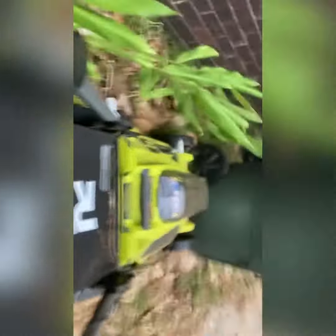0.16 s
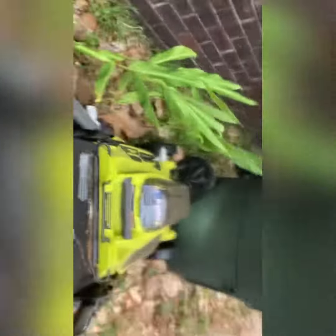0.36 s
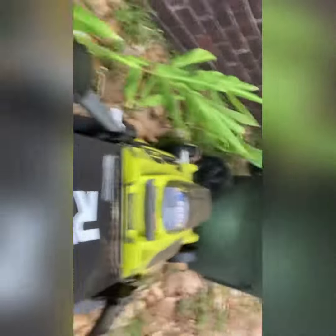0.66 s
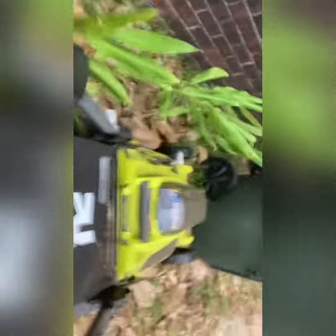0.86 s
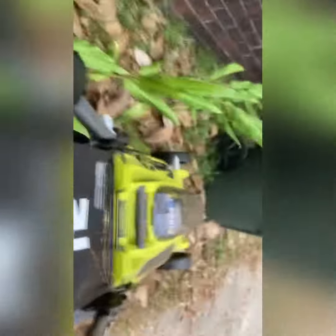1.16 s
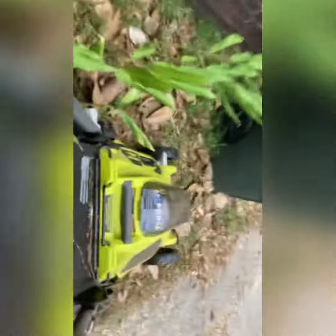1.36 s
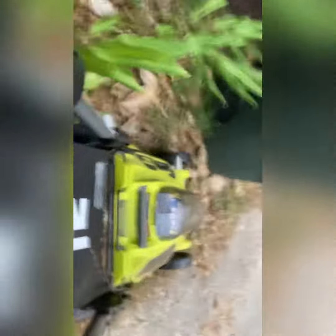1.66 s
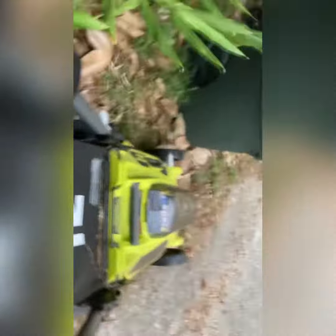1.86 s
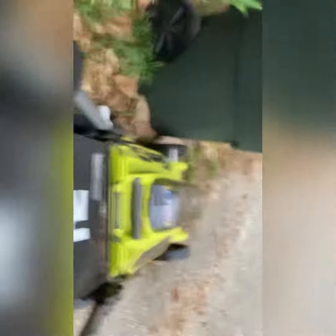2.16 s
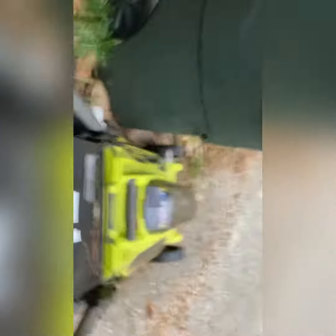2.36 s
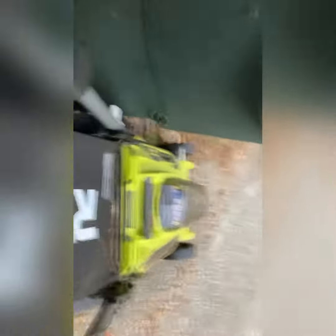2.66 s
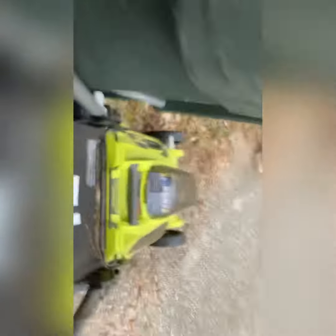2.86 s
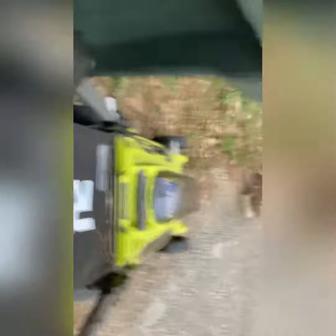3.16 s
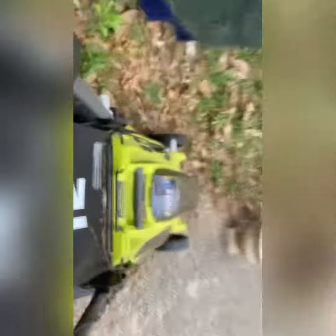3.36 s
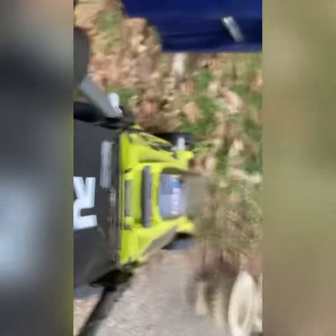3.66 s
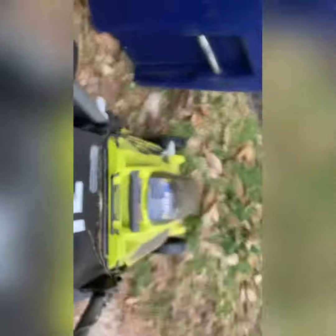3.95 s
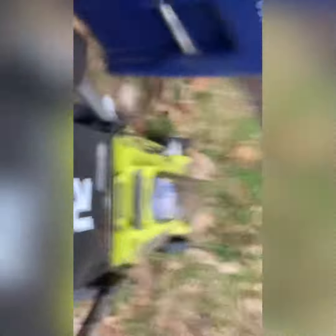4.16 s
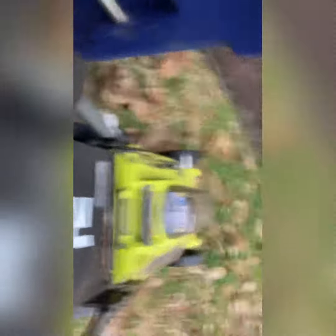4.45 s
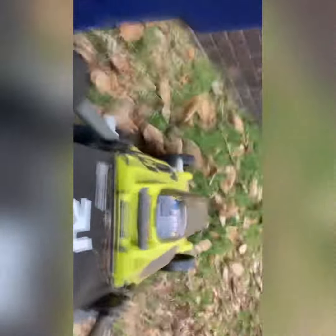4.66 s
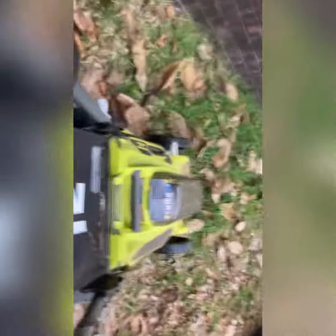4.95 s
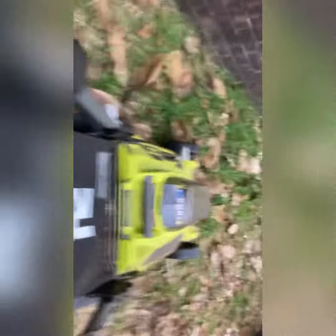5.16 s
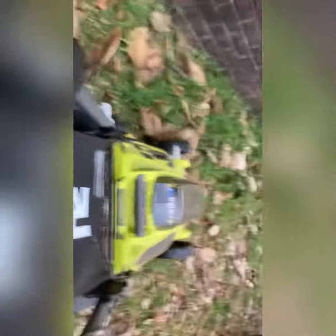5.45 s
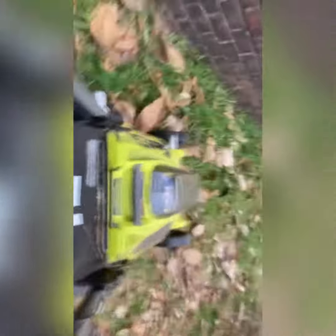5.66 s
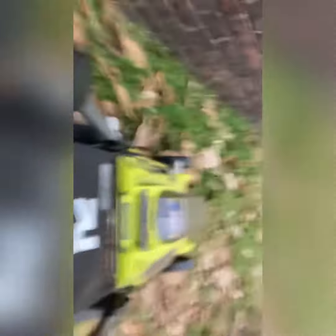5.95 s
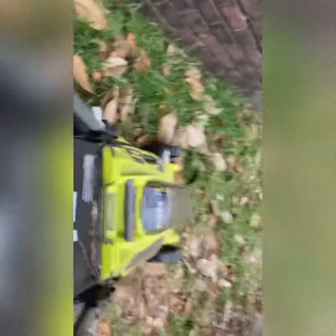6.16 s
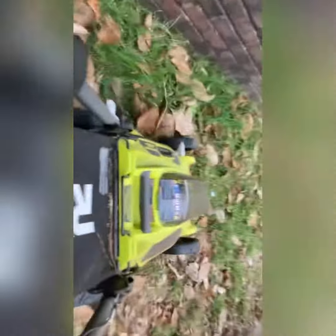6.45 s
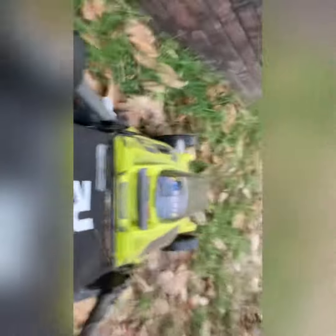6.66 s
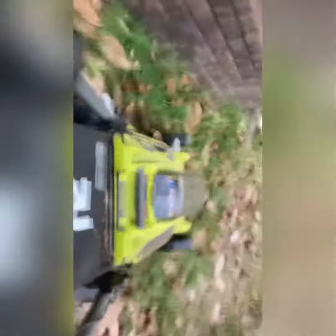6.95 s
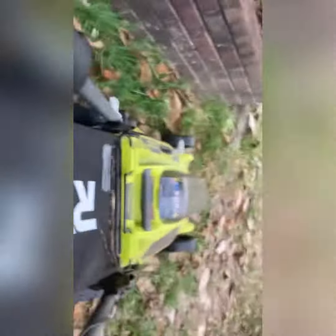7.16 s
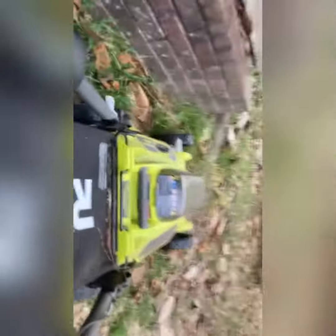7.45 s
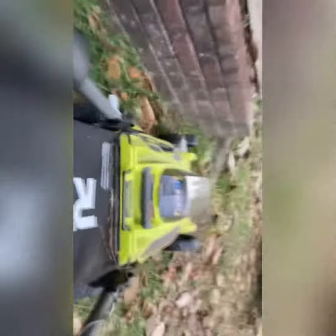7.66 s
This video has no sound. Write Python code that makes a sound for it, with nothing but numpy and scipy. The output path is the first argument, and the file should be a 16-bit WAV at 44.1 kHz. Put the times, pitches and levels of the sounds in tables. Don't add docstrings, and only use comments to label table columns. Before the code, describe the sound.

Close, steady mower whir with rushing air, blade hum dipping under load, crunchy leaf shredding and occasional dull clumps knocking the plastic shell.

```python
import sys
import numpy as np
from scipy import signal
from scipy.fft import rfft, irfft, next_fast_len
from scipy.io import wavfile
from scipy.ndimage import uniform_filter1d, map_coordinates

SR = 44100
rng = np.random.default_rng(int(sys.argv[2]) if len(sys.argv) > 2 else 0)


def gain_from_decibels(decibels):
    exponent = np.asarray(decibels, float) / 20
    return 10 ** exponent


def wrap_up_sound(samples):
    columns = np.atleast_2d(samples).T
    tamed = np.clip(columns, -1, 1)
    steps = np.round(tamed * 32767).astype(np.int16)
    wavfile.write(sys.argv[1], SR, steps)


N = 343980

# time in seconds, pass rate in Hz, hum level in dB.
BLADE = [(0, 132.7, -23.5), (.54, 133.2, -25.5), (.91, 135, -26), (1.15, 127.3, -32.5), (1.5, 113, -30),
         (1.95, 116.9, -35), (2.5, 134.6, -25), (2.65, 136.8, -31), (3.24, 114, -32), (3.45, 118, -33),
         (3.76, 119, -39), (4.08, 120.4, -23.5), (4.6, 121.3, -38.5), (5.24, 132.6, -28.5),
         (5.5, 133.2, -26), (6.1, 122.7, -25), (6.45, 129.4, -25), (7.8, 136.1, -30.5)]
# multiple of the pass rate, level in dB
FURTHER_TONES = [(6, -10), (7, -12), (8, -11), (9, -13), (10, -14), (.5, -22), (1.5, -10), (2.5, -8)]
# start in seconds, length in seconds, multiple, gain in dB.
BOOMS = [(0, 0.046, 3, 17), (0.127, .55, 3, 12), (.05, 0.65, 4, 4), (.1, 0.41, 5, 6), (2.56, 0.24, 4, 5.5),
         (2.6, 0.43, 5, 3), (4.1, 0.39, 5, 8.5), (4.898, 0.47, 5, 9), (5.305, 0.566, 4, 5),
         (5.555, 0.46, 5, 8), (7.65, 0.19, 5, 9), (.8, 0.32, 3, 7.5), (1.08, 0.13, 2, 9),
         (1.206, 0.33, 3, 10), (1.8, 0.59, 3, 5.5), (2.45, 0.48, 2, 8.5), (3.26, 0.33, 2, 13),
         (3.799, 0.23, 2, 7.5), (4.049, 0.29, 4, 3.5), (4.212, 0.24, 2, 11.5), (4.549, .5, 3, 13),
         (4.665, 0.44, 2, 13), (5.205, 0.51, 2, 10), (5.452, 0.18, 3, 11), (5.749, 0.21, 3, 5.5),
         (6.748, .25, 2, 6), (6.8, .65, 3, 9), (7.1, 0.19, 2, -0.5), (7.25, 0.19, 4, 7.5)]
# time in seconds, flow in dB, opening of the slot under the deck in dB.
AIR_FLOW = [(0, -24.5, -45), (.15, -28, -47), (.5, -29, -44), (1.34, -32, -40), (2.19, -27, -34),
            (2.6, -25, -29), (3.04, -24, -29.5), (3.17, -20, -34), (3.26, -26.5, -33), (3.8, -27, -34.5),
            (4.28, -24.5, -44), (4.82, -25, -33.5), (5.0, -24, -32), (5.19, -25.5, -32.5),
            (5.6, -23.5, -32.5), (6.0, -25, -34.5), (6.2, -27.5, -42.5), (7.8, -29.5, -35.5)]
# frequency in Hz, density in dB per Hz.
CHURN_SPECTRUM = [(25, -48), (50, -39), (65, -16), (90, -9), (160, -4.5), (300, -2), (450, -2), (580, -2.5),
                  (800, -19), (3000, -67)]
# frequency in Hz, density in dB per Hz.
RUSH_SPECTRUM = [(250, -35), (480, -5.5), (640, -1.5), (800, -5), (1100, -6.5), (1400, -8), (2100, -13.5),
                 (2700, -11), (3600, -20.5), (6000, -25.5), (16000, -34)]
# frequency in Hz, density in dB per Hz.
SLOT_SPECTRUM = [(900, -30), (1350, -6.5), (1620, -2), (1900, -6), (2300, -13), (3500, -30)]
# time in seconds, leaf feed in dB, coarse share in dB.
SHREDDING = [(0.0, -24.5, -9), (0.24, -30.5, -7), (0.59, -29.5, -8.5), (1.13, -37, -6), (1.5, -37, -6.5),
             (2.13, -28.5, -6.5), (2.52, -35, -3.5), (3.04, -34, -7), (3.48, -38, -8), (3.76, -36, -11),
             (3.91, -33.5, -8), (4.32, -30, -6.5), (4.65, -27.5, -13.5), (5.13, -29.5, -7),
             (5.41, -29.5, -5), (5.82, -23, -6.5), (6.02, -27.5, -6), (7.8, -33, -4)]
# start in seconds, length in seconds, gain in dB.
MOUTHFULS = [(.0, 0.048, -2), (.7, 0.11, 0.5), (2.09, 0.042, 2), (2.18, 0.11, -1), (2.72, 0.15, 2.5),
             (3.12, .1, 2), (3.5, 0.059, 4.5), (3.74, 0.11, 5.5), (3.9, 0.055, 4), (4.12, 0.032, 4.5),
             (4.3, 0.071, 3.5), (4.47, 0.16, 3), (5.38, 0.048, 4), (5.9, 0.1, 2.5), (6.27, 0.11, 4.5),
             (6.45, 0.21, 2), (6.81, 0.058, 0), (6.98, 0.13, 4), (7.27, 0.047, 5.5), (7.39, 0.067, 3),
             (7.75, 0.061, 3.5)]
# start in seconds, length in seconds, loss in dB.
LULLS = [
    (.075, 0.023, 1),
    (2.05, 0.037, 6.5),
    (3.6, 0.061, 0.5),
    (4.37, 0.078, 4.5),
    (6.005, 0.036, 2),
    (6.2, 0.043, 0.5),
    (7.01, 0.029, 3),
    (7.34, .04, 1.5),
]
# frequency in Hz, density in dB per Hz.
FINE_SPECTRUM = [(2000, -40), (4500, -13), (6200, -7), (7300, -2), (8200, -1), (10000, -2), (12300, 0),
                 (13500, -1), (14800, -2.5), (15800, -4), (16300, -40)]
# frequency in Hz, density in dB per Hz.
COARSE_SPECTRUM = [(600, -30), (1500, -1.5), (3000, -0.5), (4200, -0.5), (5300, -1), (6500, -5.5),
                   (9000, -9), (16000, -42)]
# time in seconds, peak in dB, coarse part in dB.
SNAPS = [(0.0618, -7, -17), (0.135, -4, -22), (0.1635, -13, -25), (0.222, -10.5, -15), (0.7228, -10.5, -15),
         (0.9103, -9.5, -21), (1.7371, -18, -23), (2.0946, -10, -17), (2.16, -5.5, -15.5),
         (2.1839, -12, -17), (2.1994, -5, -16.5), (2.2813, -10, -17), (3.2964, -14.5, -25),
         (3.7062, -13, -27), (3.933, -8, -21), (4.4526, -10, -18), (4.6648, -15, -28), (4.9442, -19, -15),
         (5.392, -12, -16), (5.6087, -7, -15.5), (5.7802, -15, -20), (5.7942, -6.5, -17),
         (5.8656, -10, -12), (6.2806, -15, -24), (6.348, -12, -23), (6.8125, -7, -17), (6.8272, -3.5, -21),
         (7.0234, -9.5, -17), (7.5208, -9.5, -25), (7.5712, -16, -17),
         (6.8341, -8, -17),
    (6.8443, -10.5, -9),
    (7.0384, -10, -11.5),
    (7.058, -15, -14),
]
# time in seconds, peak in dB.
FURTHER_SNAPS = [(0.252, -10.5), (0.543, -16), (0.8729, -27), (0.9794, -15.5), (1.1278, -14.5), (1.5359, -20),
                 (1.8221, -17), (1.9987, -18.5), (3.5616, -16.5), (3.773, -16), (3.9075, -12.5), (4.0596, -15),
                 (4.1076, -12), (4.5994, -18), (4.6853, -23), (4.9764, -10.5), (4.9995, -11.5), (5.0988, -9),
                 (5.148, -13), (5.2744, -20), (5.6691, -7), (6.1418, -17), (6.2133, -14), (6.4177, -11),
                 (6.4484, -10), (6.8504, -7.5), (7.0004, -11), (7.1246, -12.5), (7.3392, -17), (7.7539, -15)]
# time in seconds, peak in dB, ring in Hz.
THUMPS = [(0.125, -5, 417), (0.478, -3.5, 393), (2.667, -18, 265), (2.83, -3, 253), (3.134, -4, 246),
          (3.215, -5, 243.2), (3.465, -20, 237), (4.449, -4.5, 471), (4.506, -3, 354), (4.595, -4, 391.4),
          (5.133, -5, 527), (5.964, -7, 394)]
# frequency in Hz, likeness from 0 to 1.
PORT_LIKENESS = [(40, 0.22), (70, 0.39), (110, 0.97), (350, 0.96), (1000, 0.67), (1700, 0.83), (3100, 0.39),
                 (4500, 0.46), (5900, 0.39), (6900, 0.79), (9000, 0.59), (11000, 1), (13000, 1), (15000, 1)]
# frequency in Hz, lead of the left in radians.
LEFT_LEAD = [(0, 0), (860, -.6), (1700, 0), (2500, .65), (3800, .5), (5200, 1.3), (5900, 1.9), (6500, 2.7),
             (7250, 3.14), (7900, 3.6), (11000, 6.28), (14100, 8.45), (14900, 9.3), (17000, 9.6)]
# frequency in Hz, left minus right in dB.
LEFT_LEAN = [(60, -9), (130, 0.5), (290, 0.5), (640, 0.0), (1410, -2.5), (3100, -3), (6820, -1), (15000, 0)]


def unit(x):
    return x / np.sqrt(np.mean(x ** 2) + 1e-20)


def along(points, hz):
    f, value = np.transpose(points)
    return np.interp(np.log(hz + 1), np.log(f + 1), value)


def curves(rows):
    s, *columns = np.transpose(rows)
    return [np.interp(np.arange(N) / SR, s, column) for column in columns]


def wobble(rate):
    knots = rng.standard_normal(int(N * rate / SR) + 4)
    return map_coordinates(knots, [np.arange(N) * rate / SR])


def swell(rows, rise_s):
    out = np.zeros(N)
    for s, length, db in rows:
        first = max(round((s - rise_s) * SR), 0)
        last = min(round((s + length + rise_s) * SR), N)
        t = np.arange(first, last) / SR
        to_edge = np.minimum(t - s, s + length - t)
        out[first:first + len(t)] += db * np.clip(to_edge / rise_s + .5, 0, 1)
    return out


def filtered(x, response):
    m = next_fast_len(N + 8192)
    return irfft(rfft(x, m) * response(np.fft.rfftfreq(m, 1 / SR)), m)[..., :N]


def patchy_noise(spectrum, patchy_db):
    z = signal.stft(rng.standard_normal((2, N + 512)), nperseg=512)[2]
    field = uniform_filter1d(rng.standard_normal(z.shape[1:]), size=6, axis=0)
    field = uniform_filter1d(field, size=10, axis=1)
    pair = signal.istft(z * gain_from_decibels(patchy_db * unit(field)), nperseg=512)[1][:, :N]
    return unit(filtered(pair, lambda hz: gain_from_decibels(along(spectrum, hz))))


def passes():
    return np.cumsum(curves(BLADE)[0]) / SR


def beat(depth_db, spread_db):
    turn = passes()
    size = rng.standard_normal(N // 200)[turn.astype(int)]
    gain = gain_from_decibels(spread_db * size - depth_db * (turn % 1))
    return unit(uniform_filter1d(gain, size=40))


def feed():
    return curves(SHREDDING)[0] + swell(MOUTHFULS, rise_s=0.068)


def lull():
    return swell(LULLS, rise_s=0.014)


def air():
    flow_db, slot_db = curves(AIR_FLOW)
    flow_change = flow_db - flow_db.mean()
    feed_change = feed() - np.mean(SHREDDING, axis=0)[1]
    rush_db = -32 + 0.47 * flow_change + 0.6 * feed_change
    churn = gain_from_decibels(flow_db - 3.5 + 1.3 * wobble(14)) * beat(depth_db=3, spread_db=1.5)
    churn = churn * patchy_noise(CHURN_SPECTRUM, patchy_db=2.0)
    slot = gain_from_decibels(slot_db - 2.0 + 1.3 * wobble(12)) * beat(depth_db=2.0, spread_db=3.0)
    slot = slot * patchy_noise(SLOT_SPECTRUM, patchy_db=2.0)
    mid = gain_from_decibels(rush_db + 1.4 * wobble(14)) * beat(depth_db=2, spread_db=1.5)
    mid = mid * patchy_noise(RUSH_SPECTRUM, patchy_db=2.5)
    return gain_from_decibels(-.7 * lull()) * (churn + slot + mid)


def thumps():
    out = np.zeros(N + SR)
    t = np.arange(SR // 10) / SR
    for s, db, hz in THUMPS:
        envelope = gain_from_decibels(db - 6 - 60 * t / .06) * (1 - np.exp(-t / .004))
        out[round(s * SR):][:len(t)] += envelope * np.sin(2 * np.pi * hz * t)
    return np.array([out[:N], out[:N]])


def crackle(rate, spread_db, t60):
    hits = np.zeros(N)
    when, chance = rng.random((int(rate * N / SR), 2)).T
    sizes = gain_from_decibels(-2 * spread_db * np.log(1 - .98 * chance))
    np.add.at(hits, (when * N).astype(int), sizes)
    power = signal.lfilter([1], [1, -gain_from_decibels(-120 / (t60 * SR))], hits)
    return np.sqrt(power / np.mean(power))


def leaves():
    hiss_db = feed() - 0.75 * lull()
    coarse_db = curves(SHREDDING)[1]
    grit = gain_from_decibels(hiss_db + 1.18 * wobble(25)) * beat(depth_db=1.5, spread_db=0.62)
    grit *= np.sqrt(.6 + .4 * crackle(rate=300, spread_db=2.6, t60=.02) ** 2)
    t = np.arange(SR // 10) / SR
    fine_power = np.pad((gain_from_decibels(3.5) * grit) ** 2, (0, len(t)))
    coarse_power = np.pad((gain_from_decibels(coarse_db + 2.0) * grit) ** 2, (0, len(t)))
    sharp_break = gain_from_decibels(-120 * t / 0.016)
    shower = gain_from_decibels(-21.5 - 120 * t / 0.086)
    burst = (sharp_break + shower) * np.minimum(t / 0.0015, 1) ** 2
    further_snaps = [(s, db, -16) for s, db in FURTHER_SNAPS]
    for s, db, low_db in [*SNAPS, *further_snaps]:
        first = round(s * SR)
        fine_power[first:][:len(t)] += gain_from_decibels(2 * (db - 2.5)) * burst
        coarse_power[first:][:len(t)] += gain_from_decibels(2 * (db + low_db + 7.5)) * burst
    fine = np.sqrt(fine_power[:N]) * patchy_noise(FINE_SPECTRUM, patchy_db=1.04)
    coarse = np.sqrt(coarse_power[:N]) * patchy_noise(COARSE_SPECTRUM, patchy_db=2.0)
    return fine + coarse


def overtone_level(multiple, mean_db):
    flow_db = curves(AIR_FLOW)[0]
    rows = [(s, length, db) for s, length, k, db in BOOMS if round(k) == multiple]
    growth = 0.78 * (flow_db - flow_db.mean())
    return mean_db + growth + swell(rows, rise_s=0.088) + 2.1 * wobble(5)


def hum():
    first_db = curves(BLADE)[1]
    second_db, third_db = overtone_level(2, -39.5), overtone_level(3, -42.5)
    fourth_db, fifth_db = overtone_level(4, -40.5), overtone_level(5, -43.5)
    angle = 2 * np.pi * passes() + .25 * wobble(8)
    tone = gain_from_decibels(first_db + 1.7 * wobble(22)) * np.sin(angle + 0.13 * wobble(25))
    tone += gain_from_decibels(second_db + 2.6 * wobble(28)) * np.sin(2 * angle + .9 + .45 * wobble(25))
    tone += gain_from_decibels(third_db + 2.2 * wobble(28)) * np.sin(3 * angle + 2.2 + .45 * wobble(25))
    tone += gain_from_decibels(fourth_db + 3.2 * wobble(18)) * np.sin(4 * angle + .6 * wobble(25))
    tone += gain_from_decibels(fifth_db + 3.2 * wobble(18)) * np.sin(5 * angle + .6 * wobble(25))
    for order, db in FURTHER_TONES:
        level = gain_from_decibels(fourth_db + db + 3.5 * wobble(14))
        tone += level * np.sin(order * angle + .7 * wobble(22))
    return np.sqrt(2) * gain_from_decibels(-1.2 * lull()) * np.array([tone, tone])


def scene():
    return air() + thumps() + leaves() + hum()


def top_cut(x):
    return signal.sosfilt(signal.butter(12, 15740, fs=SR, output="sos"), x)


def record(dry):
    def half_angle(hz):
        return np.arccos(np.clip(along(PORT_LIKENESS, hz), 0, 1)) / 2

    def half_difference(hz):
        lead = np.interp(hz, *np.transpose(LEFT_LEAD))
        return gain_from_decibels(along(LEFT_LEAN, hz) / 2) * np.exp(.5j * lead)

    mix = filtered(dry, lambda hz: np.array([np.cos(half_angle(hz)), 1j * np.sin(half_angle(hz))]))
    shared, apart = filtered(mix, lambda hz: hz ** 2 / (hz ** 2 + 55 ** 2))
    ports = np.array([shared + apart, shared - apart])
    ports = filtered(ports, lambda hz: np.array([half_difference(hz), 1 / half_difference(hz)]))
    return top_cut(ports)


dry = scene()
out = record(dry)
wrap_up_sound(out)
```